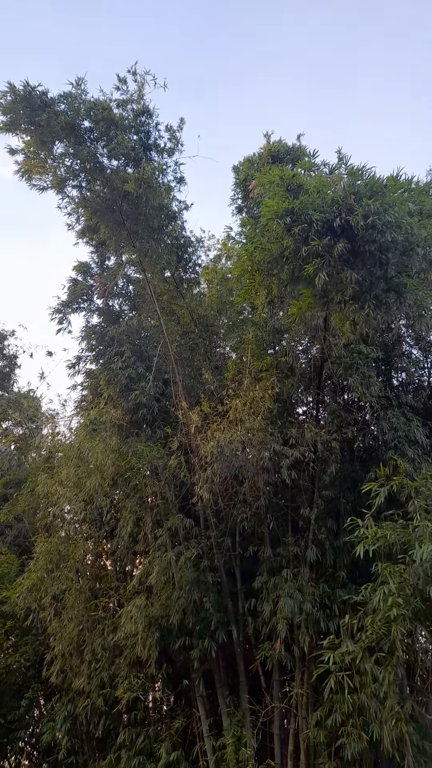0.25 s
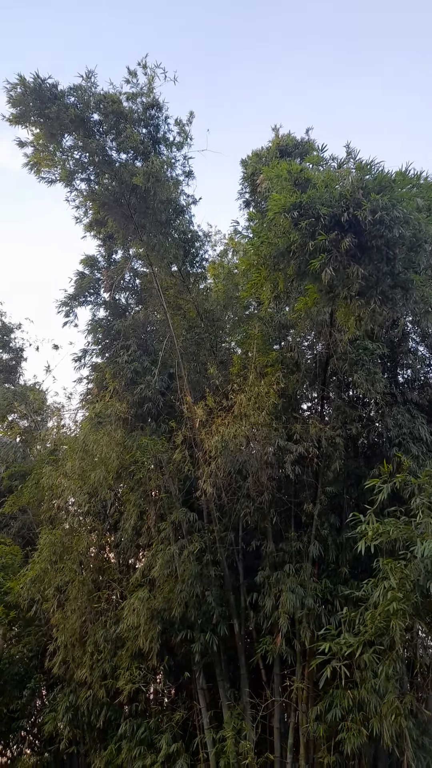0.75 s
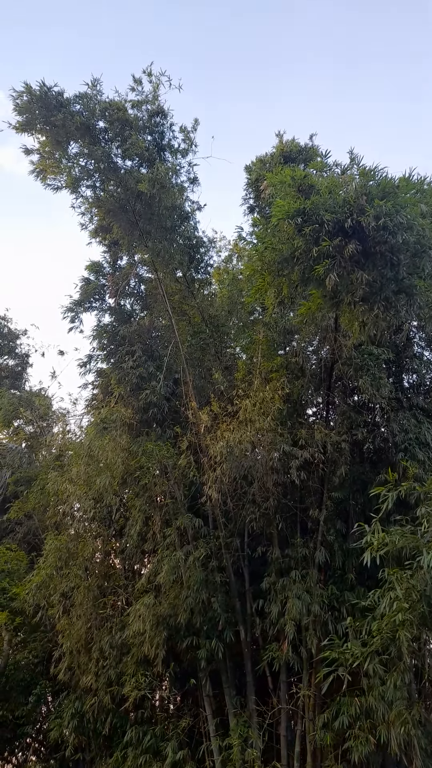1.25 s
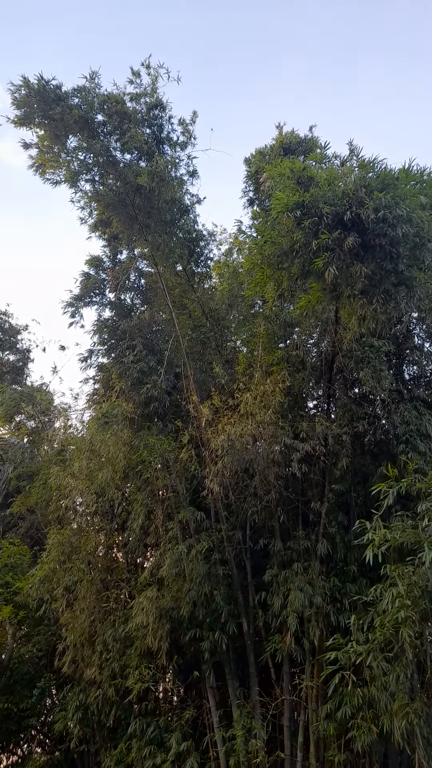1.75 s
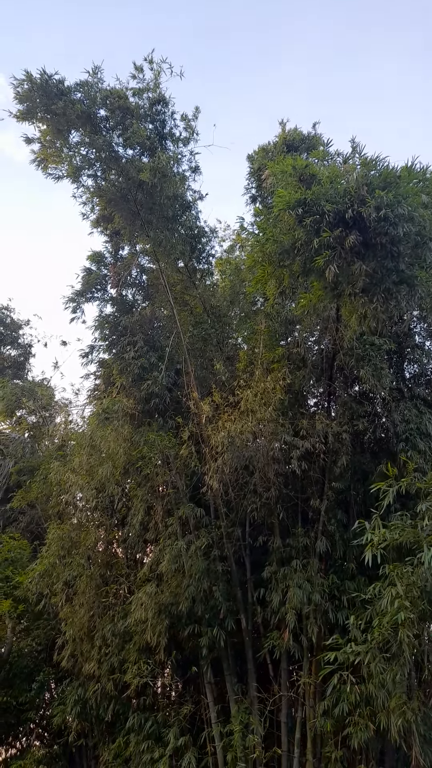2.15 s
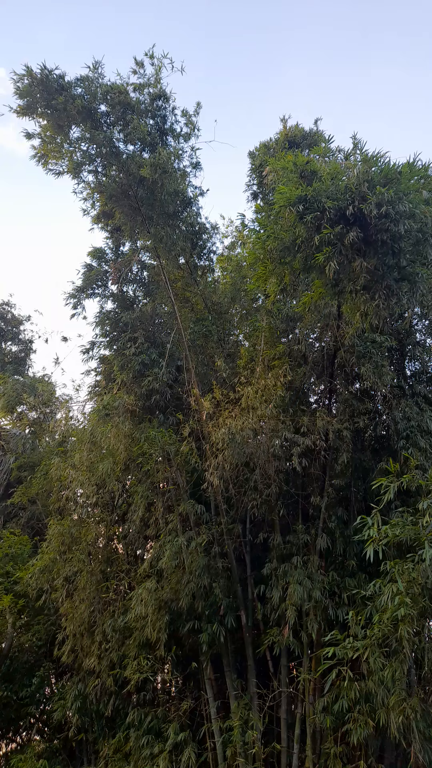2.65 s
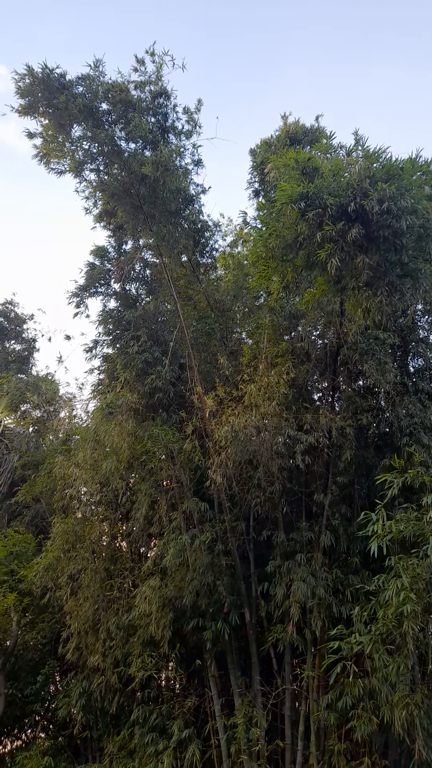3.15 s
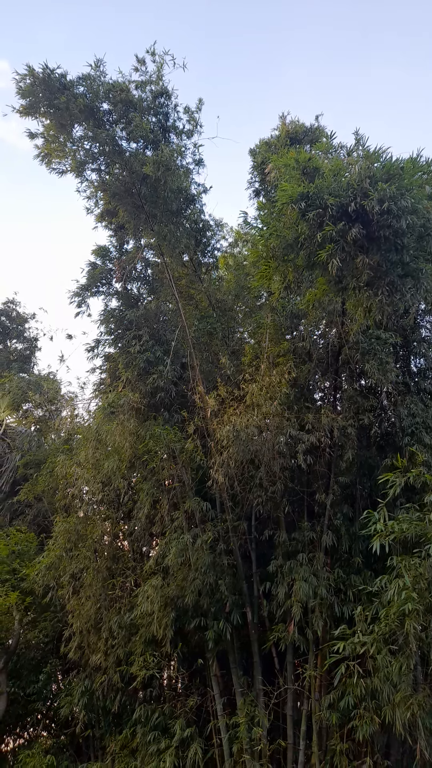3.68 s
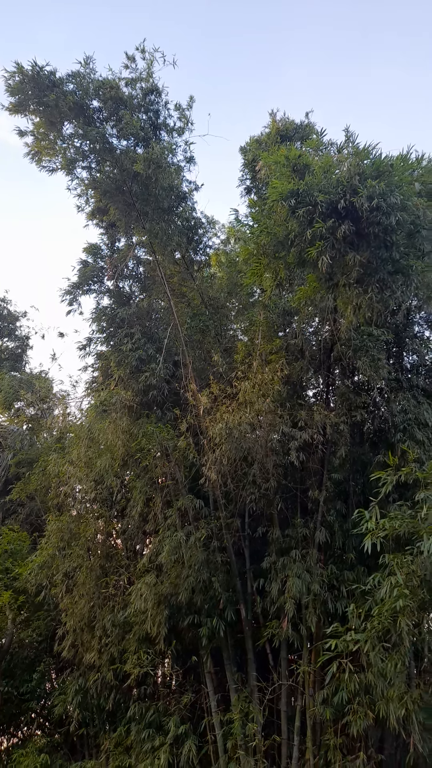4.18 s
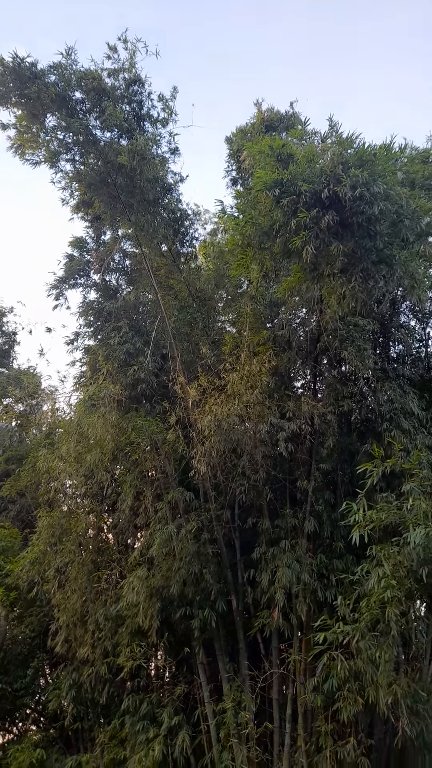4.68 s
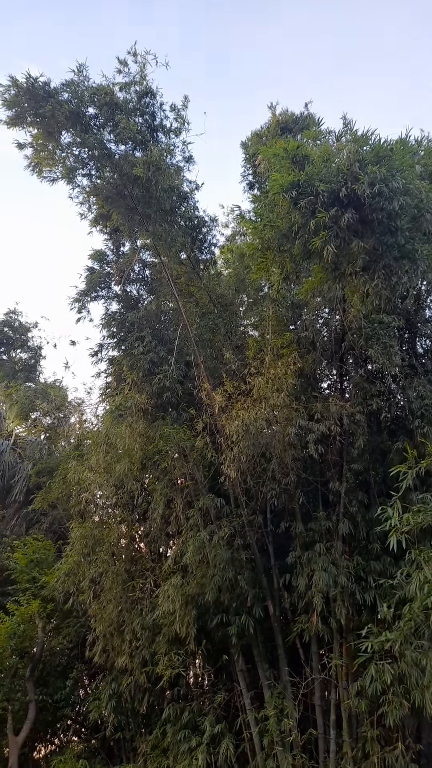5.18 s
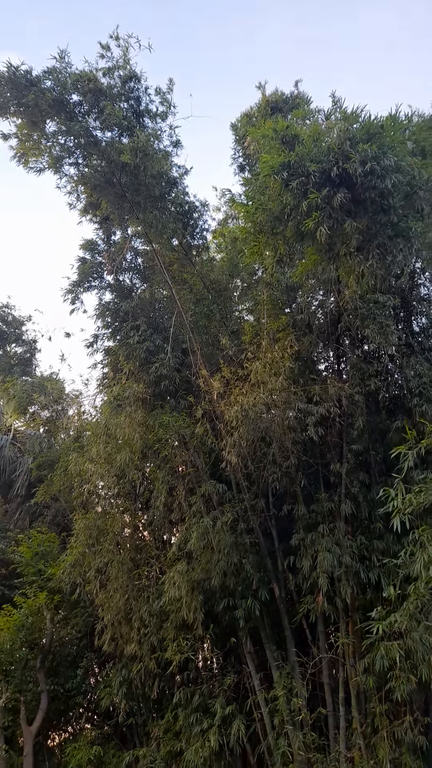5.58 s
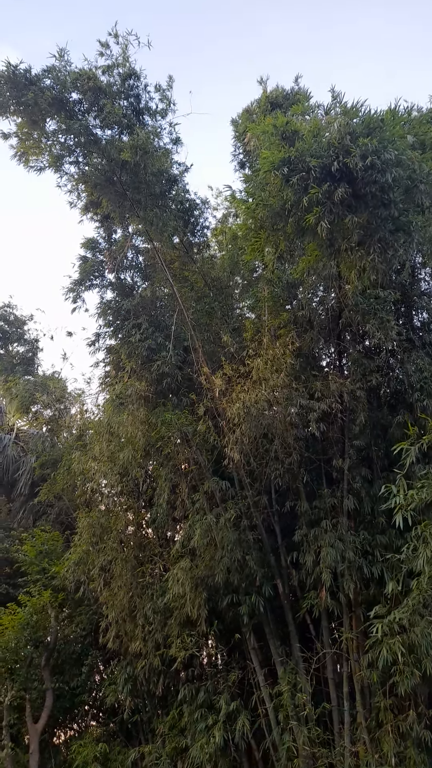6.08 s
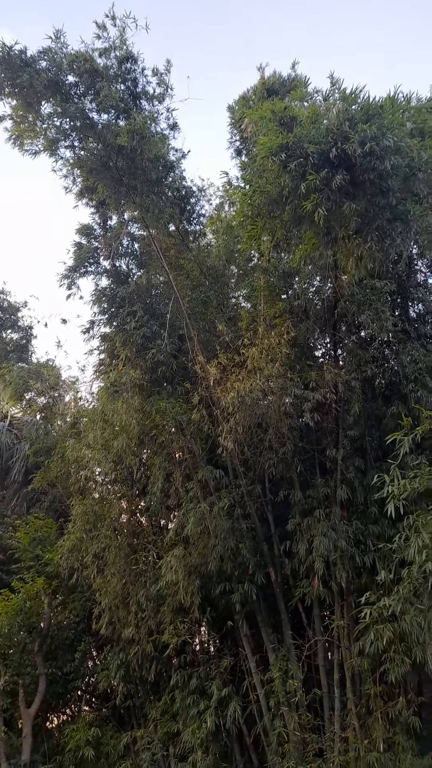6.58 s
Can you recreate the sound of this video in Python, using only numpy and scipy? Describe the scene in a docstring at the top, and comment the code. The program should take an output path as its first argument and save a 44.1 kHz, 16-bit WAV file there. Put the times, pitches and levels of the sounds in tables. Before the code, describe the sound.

A bird scolds in a bamboo grove with short, harsh, high rasps, each about a third of a second long, slightly to the right and with a brief echo. The calls start at about 0.2, 1.0, 1.8, 2.4, 3.1, 4.0, 4.7 and 5.5 seconds, loudest around 1.8, 2.4 and 4.7. A softer, longer one follows at 5.9, and another begins at 6.7, right at the end. Distant birds add faint rasps and thin chirps in between. A few soft, dry twig ticks come from the left between 0.5 and 1.1 seconds, with fainter ones between 3 and 4. Around 5.5 seconds there is a slight dull bump and a barely audible, wavering, far-off bird cry. Throughout, a faint, very high insect buzz sits over a quiet outdoor hush, and light wind rumbles unevenly on the microphone.

```python
"""Shrike in a bamboo grove.

A shrike scolds in harsh rasps: its syrinx snaps about a hundred times a second and rings its throat.
Fainter birds answer from farther off, an insect's wings buzz high and steady, and twigs tick.
Air rumbles unevenly on the microphone's two ports over a quiet outdoor hush."""
import sys
import numpy as np
from scipy import signal
from scipy.fft import rfft, irfft, next_fast_len
from scipy.io import wavfile
from scipy.ndimage import uniform_filter1d

SR = 44100
rng = np.random.default_rng(int(sys.argv[2]) if len(sys.argv) > 2 else 0)


def store_wav(level_fs):
    """Save 16-bit WAV to argv[1]."""
    pcm = np.round(np.clip(np.atleast_2d(level_fs), -1, 1) * 32767)
    wavfile.write(sys.argv[1], SR, pcm.T.astype(np.int16))


N = 301203
TIME_S = np.arange(N) / SR


def gain_of(db):
    """Decibels to amplitude."""
    return 10 ** (np.asarray(db) / 20)


def unit_rms(x):
    """Scales to rms 1."""
    return x / np.sqrt(np.mean(x ** 2) + 1e-20)


def lookup(table, hz):
    """Interpolates a table on a log-frequency axis."""
    table_hz, value = np.transpose(table)
    return np.interp(np.log(hz + 1), np.log(table_hz + 1), value)


def add(mix, start_s, sound):
    """Mixes a sound in at start_s."""
    part = mix[max(round(start_s * SR), 0):][:len(sound)]
    part += sound[:len(part)]


def colour(x, spectrum):
    """Filters by rows of Hz, dB."""
    size = next_fast_len(x.shape[-1] + 2048)
    gain = gain_of(lookup(spectrum, np.fft.rfftfreq(size, 1 / SR)))
    return irfft(rfft(x, size) * gain, size)[..., :x.shape[-1]]


def delayed(x, ms):
    """Fractional-sample delay."""
    size = next_fast_len(N + SR // 10)
    khz = np.fft.rfftfreq(size, 1000 / SR)
    return irfft(rfft(x, size) * np.exp(-2j * np.pi * khz * ms), size)[:N]


def wander(size, rate_hz):
    """Random curve of rms 1, with rate_hz new values a second."""
    steps = np.arange(size)
    return unit_rms(np.interp(steps * rate_hz / SR, steps, rng.standard_normal(size)))


def resonate(x, hz, width_hz):
    """Two identical resonators in series, following the curve hz."""
    turn = np.exp(2j * np.pi * np.cumsum(hz) / SR)
    pole = np.exp(-np.pi * width_hz / SR)
    for _ in range(2):
        x = 2 * (turn * signal.lfilter([1 - pole], [1, -pole], x / turn + 1e-18)).real
    return x


def panned(x, left_db):
    """Shifts the left-right balance by left_db."""
    return x * gain_of([[left_db / 2], [-left_db / 2]])


# Likeness of the ports. Each row: frequency in Hz, left-right correlation.
PORT_CORRELATION = [(60,0.6),(300,0.52),(700,0.505),(1500,0.178),(3000,0.01),(15000,0.16)]

def diffuse(spectrum):
    """Noise from all around, most alike at the two ports in the bass."""
    size = next_fast_len(N)
    hz = np.fft.rfftfreq(size, 1 / SR)
    left, independent = rfft(rng.standard_normal((2, size)))
    correlation = lookup(PORT_CORRELATION, hz)
    right = correlation * left + np.sqrt(1 - correlation ** 2) * independent
    return unit_rms(irfft(np.array([left, right]) * gain_of(lookup(spectrum, hz)))[:, :N])


# Grove decay. Each row: frequency in Hz, T60 in seconds before t60_scale.
GROVE_DECAY = [(300,0.68),(2000,0.622),(5000,0.82),(12000,0.044)]

def grove(x, t60_scale, taps_per_s=3000):
    """Stems and leaves scatter sound: sparse echoes, each band dying at its own rate."""
    taps = rng.standard_normal((2, SR)) * (rng.random((2, SR)) < taps_per_s / SR)
    hz, t, bands = signal.stft(taps, SR, nperseg=256)
    t60_s = t60_scale * lookup(GROVE_DECAY, hz)[:, None]
    _, tail = signal.istft(bands * gain_of(-60 * t / t60_s), SR, nperseg=256)
    tail /= np.linalg.norm(tail, axis=1, keepdims=True)
    return signal.fftconvolve(x[None], tail, axes=1)[:, :N]


# Each row: frequency in Hz, relative level in dB.
HUSH_SPECTRUM = [(30,-3.5),(150,-6.5),(300,6),(420,2.5),(600,3.5),(1100,-0.5),(1700,0.5),(2500,3.5),(4000,0),(6500,1.5),(7400,1),(8200,-4),(9000,-6),(12500,-4.5),(15500,-8)]
# Each row: time in seconds, gain in dB.
HUSH_GAIN = [(0,-1.5),(.9,-1.5),(1.6,-1.5),(2.3,-0.5),(2.9,-0.5),(3.7,-0.1),(4.5,-0.5),(5.3,-0.1),(6.1,2),(6.83,-1.38)]
# Each row: frequency in Hz, left minus right in dB.
HUSH_PAN = [(60, 20), (110, -1), (200, -1), (380, -5), (700, -1), (1290, -3.0), (2380, -6.5), (4400, -3),
            (8120, -3.5), (15000, 3.5)]

def hush(level_db=-53):
    """Faint outdoor noise that swells slowly."""
    swell_db = np.interp(TIME_S, *np.transpose(HUSH_GAIN)) + 0.53 * wander(N, 6.4)
    left, right = diffuse(HUSH_SPECTRUM) * gain_of(swell_db)
    half_pan = np.array(HUSH_PAN) * [1, .5]
    return gain_of(level_db) * np.array([colour(left, half_pan), colour(right, half_pan * [1, -1])])


# Each row: frequency in Hz, relative level in dB.
EDDY_SPECTRUM = [(20,-48),(35,-22),(52,-5.5),(72,6.5),(92,-1.5),(120,-8),(160,-17),(230,-33.5),(500,-52)]
# Breeze and lulls. Each row: time in seconds, level in dB.
BREEZE_LEVEL = [(0,-58),(0.6,-56),(1.3,-50.5),(1.54,-58),(1.75,-54.5),(2.55,-54.5),(2.86,-52.5),(2.97,-72),(3.17,-52),(3.42,-64),(3.6,-55.5),(4.25,-50.5),(4.5,-58),(5.03,-56.5),(5.17,-64),(5.32,-67),(5.45,-53.5),(6.83,-54.5)]
# Each row: centre in seconds, length in seconds, peak level in dB.
WIND_GUSTS = [(0.4,.06,-48),(0.565,0.23,-45.5),(1.005,.12,-49),(1.288,0.071,-55),(1.753,0.36,-48.5),(1.911,0.067,-49),(2.21,0.055,-49),(2.376,0.123,-47),(2.455,.06,-45.5),(3.068,0.14,-48),(3.503,0.044,-46),(3.984,0.076,-50),(4.16,0.12,-50),(4.287,0.086,-49),(4.724,0.19,-48.5),(4.968,0.074,-46),(5.42,0.15,-50),(5.737,0.13,-46.5),(5.946,.11,-46),(6.193,0.1,-43),(6.431,0.097,-47),(6.512,.1,-45),(6.627,.08,-48)]

def wind(steadiness=0.7, lump_db=2.0, lumps_per_s=14):
    """Eddies buffet the ports: a lumpy breeze, and gusts that swell and die."""
    eddies = diffuse(EDDY_SPECTRUM)
    eddy_power = uniform_filter1d((eddies ** 2).mean(0), size=3000)
    eddies = unit_rms(eddies / eddy_power ** (steadiness / 2))  # nearly even within a gust
    breeze_db = np.interp(TIME_S, *np.transpose(BREEZE_LEVEL)) + lump_db * wander(N, lumps_per_s)
    power = gain_of(breeze_db) ** 2
    for centre_s, length_s, db in WIND_GUSTS:
        add(power, centre_s - length_s / 2, gain_of(db) ** 2 * np.hanning(int(length_s * SR)))
    return panned(eddies, left_db=-2.5) * np.sqrt(power)


# Insect chorus. Each row: frequency in Hz, relative level in dB.
CHORUS_SPECTRUM = [(8800,-35.5),(9700,-17.5),(10300,-10),(10750,-4),(11050,-4.5),(11400,-14),(11900,-26),(12800,-60)]

def insect(strokes_per_s=130.5, top_hz=11250, drop_hz=950, near_db=-63.5, chorus_db=-55.0):
    """A high buzz, each wing stroke sliding down in pitch, over a smeared chorus of its kind."""
    stroke = np.cumsum(strokes_per_s * (1 + 0.0028 * wander(N, 6.8))) / SR % 1
    near = resonate(rng.standard_normal(N), top_hz - drop_hz * stroke, width_hz=420)
    near *= np.sin(np.pi * stroke)
    near = unit_rms(np.array([near, delayed(near, ms=0.061)]))
    buzz = gain_of(near_db) * near + gain_of(chorus_db) * diffuse(CHORUS_SPECTRUM)
    return panned(buzz * gain_of(.5 * wander(N, 11)), left_db=-5.5)


# Each row: start in seconds, level in dB before panning, T60 in seconds.
TWIG_TICKS = [(.554,-50,0.1),(.58,-56.5,0.092),(.83,-53.5,0.105),(1.05,-49.5,0.081),(3.1,-60,0.075),(3.83,-57,0.062)]
# Each row: start in seconds, length in seconds, level in dB before panning.
DULL_BUMPS = [(5.483,0.0793,-60.5),(5.548,0.057,-55),(6.171,0.082,-71)]
# Each row of both: frequency in Hz, relative level in dB.
TICK_SPECTRUM = [(150,1.5),(400,-4.5),(650,9),(1000,3),(1400,5.5),(2300,3),(4000,-15),(9000,-66)]
BUMP_SPECTRUM = [(70,-15),(120,-2),(155,4),(220,-18),(330,-13),(600,-10),(1000,-23),(3000,-32)]

def twigs(echo_db=-6):
    """Dry ticks with a short crumbling tail, and a few dull bumps."""
    out, t = np.zeros(N), np.arange(SR // 4) / SR
    for start_s, db, t60_s in TWIG_TICKS:
        noise = colour(rng.standard_normal(len(t)), TICK_SPECTRUM)
        add(out, start_s, gain_of(db - 60 * t / t60_s) * unit_rms(noise))
    for start_s, length_s, db in DULL_BUMPS:
        noise = colour(rng.standard_normal(int(length_s * SR)), BUMP_SPECTRUM)
        add(out, start_s, gain_of(db) * unit_rms(np.hanning(len(noise)) * noise))
    return panned(out + gain_of(echo_db) * grove(out, t60_scale=0.25), left_db=-14.5)


def far_cry(start_s=5.45, length_s=0.84, level_db=-67, start_hz=742, top_hz=790, top_s=0.42):
    """A wavering cry, perhaps a cock: one arch of pitch, heard only as its echo."""
    out, t = np.zeros(N), np.arange(0, length_s, 1 / SR)
    hz = top_hz - (top_hz - start_hz) * (t / top_s - 1) ** 2
    phase = 2 * np.pi * np.cumsum(hz * (1 + 0.0224 * wander(len(t), 90))) / SR
    tone = np.sin(phase) + gain_of(-7) * np.sin(2 * phase) + gain_of(-13) * np.sin(3 * phase)
    broken = unit_rms(tone * gain_of(3 * wander(len(t), 18.3)))
    add(out, start_s, gain_of(level_db) * broken * signal.windows.tukey(len(t), .4))
    return panned(grove(out, t60_scale=0.13), left_db=-2.1)


# Each row: start in seconds, length in seconds, relative level in dB.
FAR_RASPS = [(0.148,0.15,-57),(0.555,0.1,-57.5),(.76,0.112,-60),(1.523,0.077,-62),(3.675,0.071,-59.5),(3.809,0.11,-71),(4.557,0.078,-59.5),(5.13,0.192,-65.5),(6.461,0.12,-57.5)]
# Each row: frequency in Hz, relative level in dB.
FAR_RASP_SPECTRUM = [(900,-13),(1800,11),(2600,7.5),(3800,7.5),(5500,5.5),(8000,-40)]
# Each row: start in seconds, length in seconds, start pitch in Hz, end pitch in Hz, relative level in dB.
FAR_CHIRPS = [(0.677,0.045,6300,6150,-66),(1.382,0.046,6100,6050,-63),(2.3,0.0184,5800,4400,-64.5),(2.35,.025,5800,4370,-75.5),(2.376,0.0255,5700,4430,-75),(5.16,0.022,3050,2980,-57.5),(5.494,0.022,1190,1200,-61)]

def far_birds(puffs_per_s=100, hoarseness=0.025):
    """Distant rasps and thin chirps, blurred by foliage."""
    out = np.zeros(N)
    for start_s, length_s, db in FAR_RASPS:
        t = np.arange(0, length_s, 1 / SR)
        puffs = np.exp(-(t * puffs_per_s % 1) / 0.115) * rng.standard_normal(len(t))
        call = unit_rms(colour(puffs, FAR_RASP_SPECTRUM))
        add(out, start_s, gain_of(db) * call * signal.windows.tukey(len(t), .6))
    for start_s, length_s, start_hz, end_hz, db in FAR_CHIRPS:
        hz = np.linspace(start_hz, end_hz, int(length_s * SR))
        hz *= 1 + hoarseness * wander(len(hz), 890)
        tone = np.sin(2 * np.pi * np.cumsum(hz) / SR)
        add(out, start_s, gain_of(db) * unit_rms(tone * signal.windows.tukey(len(hz), .5)))
    return panned(grove(out, t60_scale=0.32), left_db=-4.5)


def syrinx(size, snaps_per_s, jitter=.035, snap_decay_cycles=0.0215, puff_gain=0.86):
    """Airflow as the syrinx snaps open irregularly: a sharp spike, then a slower puff."""
    cycle = np.cumsum(snaps_per_s * (1 + jitter * wander(size, 150))) / SR % 1
    flow = np.exp(-cycle / snap_decay_cycles) + puff_gain * np.exp(-cycle)
    return flow * gain_of(-0.18 * wander(size, 202.3))


# Breathy skirt round the resonances. Each row: frequency in Hz, gain in dB.
BREATH_SPECTRUM = [(500,-26),(1200,-26),(1700,-15.5),(2050,-16),(2400,-16.5),(3900,-19),(5200,-16.5),(5900,-22.5),(7400,-18.5),(9000,-17),(11000,-19.5),(13500,-27),(15500,-22)]
# Throat at rest, main resonance second.
# Each row: frequency in Hz, width in Hz, gain in dB, how far it follows the beak from 0 to 1.
THROAT_MODES = [(2735,700,-6.5,1),(3490,500,2,1.),(4380,560,-3.5,0.48),(4774,574,-5.5,0.4),(5190,470,-10.5,0.58)]

def rasp(length_s, full_db, swell_s, early_hz, full_hz, snaps_per_s, stretch, upper_db, broadening):
    """Bursts of air ring throat resonances that glide with the beak."""
    attack_s, release_s, louder_db_per_hz = 0.044, 0.056, 0.0233
    sag_hz_per_s, quiver_hz, scoop_hz, scoop_s = 200, 35.3, 280, 0.052
    t = np.arange(0, length_s, 1 / SR)
    # The beak opens, then eases shut; colour and level follow.
    effort = np.sin(np.pi / 2 * np.minimum(t / swell_s, 1)) ** 2
    main_hz = early_hz + (full_hz - early_hz) * effort - sag_hz_per_s * np.maximum(t - swell_s, 0)
    main_hz += quiver_hz * wander(len(t), 24.2)
    level_db = full_db + louder_db_per_hz * (main_hz - full_hz)
    fade = np.minimum(t / attack_s, 1) * np.minimum((length_s - t) / release_s, 1)
    # The tightening throat scoops up from below.
    opening = (main_hz - scoop_hz * np.exp(-t / scoop_s)) / THROAT_MODES[1][0]
    bright_db = upper_db + 25 * (opening - 1)  # a wider beak lets out more of the upper modes
    flow = syrinx(len(t), snaps_per_s)
    sound = colour(flow * rng.standard_normal(len(t)), BREATH_SPECTRUM)
    for mode, (hz, width_hz, db, follow) in enumerate(THROAT_MODES):
        is_upper = mode > 1
        centre_hz = hz * opening ** follow * stretch ** is_upper
        ring = resonate(flow * rng.standard_normal(len(t)), centre_hz, broadening * width_hz)
        sound += gain_of(db + is_upper * bright_db) * ring
    # Steady air pressure gives each snap about the same energy.
    sound /= np.sqrt(uniform_filter1d(sound ** 2, size=880) + 1e-12)
    return fade * gain_of(level_db) * unit_rms(sound)


# Each row: start in seconds, length in seconds, relative level at full effort in dB, time to full effort
# in seconds, nominal main resonance early and at full effort in Hz, snaps a second, upper-mode
# frequency factor, upper-mode gain in dB, left gain in dB, mode width factor.
SHRIKE_CALLS = [ (0.223, 0.36, -48, 0.18, 3260, 3460, 110, 1.01, 1, -4, 1.1),
                (0.991, 0.36, -48.5, 0.26, 3340, 3420, 100, 1.02, 2, -5, 0.976),
                (1.755, 0.35, -43.5, 0.18, 3250, 3670, 100, 1.01, 0, -2.5, 1.2),
                (2.42, 0.32, -43, 0.22, 3360, 3600, 99.3, 0.96, 2, -2.5, 1.06),
                (3.14, 0.37, -46.5, 0.2, 3310, 3420, 99.8, 0.99, 1.5, -4.5, 0.96),
                (3.973, 0.39, -45, 0.33, 3250, 3420, 97, 0.975, 2.5, -4, 1),
                (4.719, 0.38, -42, 0.21, 3280, 3710, 104.3, 0.967, 2, -3.5, 1.03),
                (5.474, 0.35, -47, 0.3, 3340, 3430, 96, 0.97, 2, -3.5, 1.1),
                (5.867, 0.5, -51.5, 0.45, 3580, 3684, 95.5, 1.1, -1, -1.5, 1.76),
                (6.725, 0.38, -46.5, 0.19, 3300, 3508, 84, 0.93, 0, -3, 2.2), ]
# Left port's response to the bird against the right's. Each row: frequency in Hz, gain in dB.
LEFT_RESPONSE = [(1500,1),(2200,-6.5),(2800,-11.5),(3300,-3.5),(3800,-6.5),(4500,-2),(5500,-5),(7000,1.5),(10500,-3),(12500,6),(15500,1.5)]

def shrike(ground_ms=9.4, ground_db=-12, leaves_db=-5.0, deep_db=-14, gain_db=5.5):
    """Calls arrive directly, off the ground, off near leaves and from deep in the grove."""
    at_left, at_right = np.zeros((2, N))
    for start_s, *manner, left_db, broadening in SHRIKE_CALLS:
        call = rasp(*manner, broadening)
        add(at_left, start_s, gain_of(left_db) * call)
        add(at_right, start_s, call)
    direct = np.array([at_left, delayed(at_right, ms=0.18)])
    ground = gain_of(ground_db) * np.array([delayed(port, ground_ms) for port in direct])
    leaves = gain_of(leaves_db) * grove(at_right, t60_scale=0.11)
    deep = gain_of(deep_db) * grove(at_right, t60_scale=0.86)
    left, right = direct + ground + leaves + deep
    return gain_of(gain_db) * np.array([colour(left, LEFT_RESPONSE), right])


def scene():
    """All sources at the two ports."""
    return shrike() + far_birds() + far_cry() + twigs() + insect() + hush() + wind()


# Microphone port notch. Each row: frequency in Hz, gain in dB.
PORT_NOTCH = [(7600,0),(8000,-3.5),(8250,-3.5),(8650,0)]

def record(dry):
    """The microphone's notch, then a steep low-pass."""
    cutoff_hz = 15800
    lowpass = signal.firwin(511, cutoff_hz, window=("kaiser", 9), fs=SR)
    return signal.oaconvolve(colour(dry, PORT_NOTCH), lowpass[None], "same")


dry = scene()
out = record(dry)
store_wav(out)
```